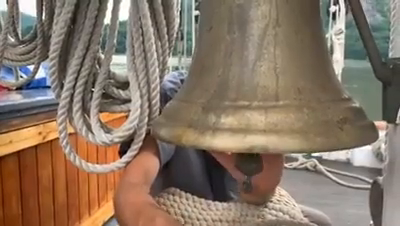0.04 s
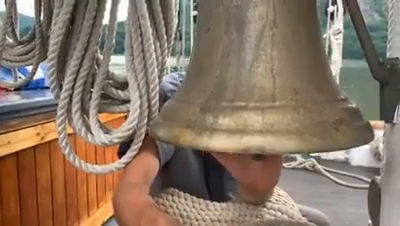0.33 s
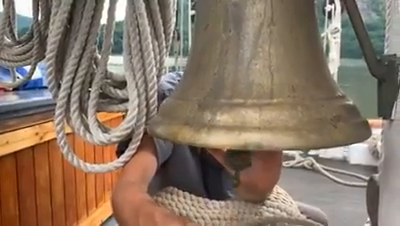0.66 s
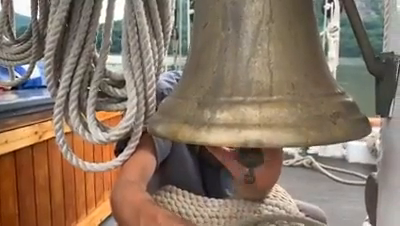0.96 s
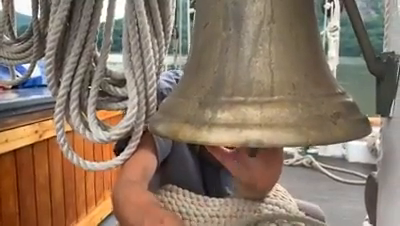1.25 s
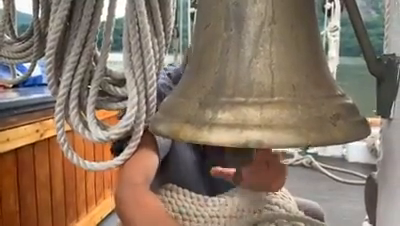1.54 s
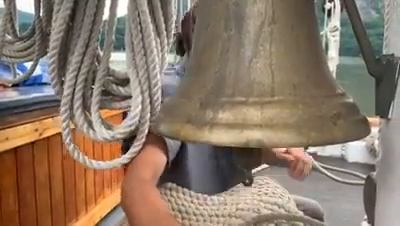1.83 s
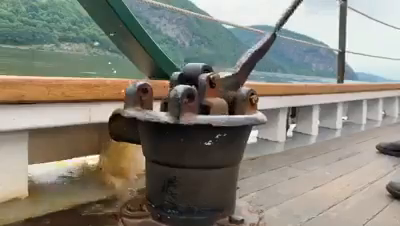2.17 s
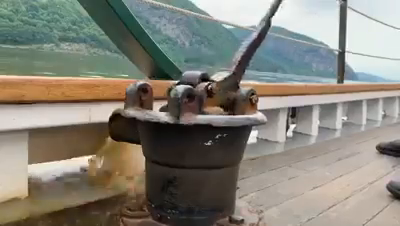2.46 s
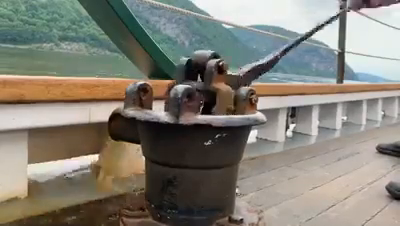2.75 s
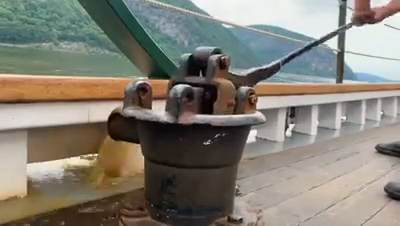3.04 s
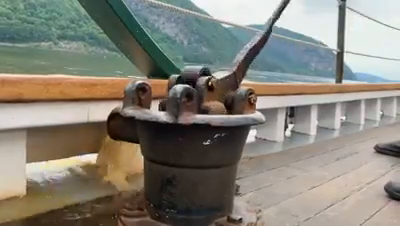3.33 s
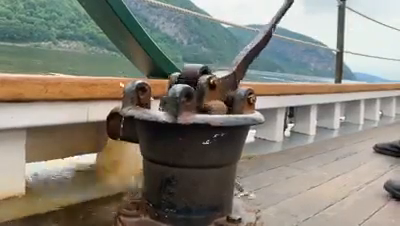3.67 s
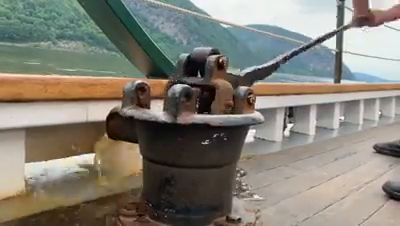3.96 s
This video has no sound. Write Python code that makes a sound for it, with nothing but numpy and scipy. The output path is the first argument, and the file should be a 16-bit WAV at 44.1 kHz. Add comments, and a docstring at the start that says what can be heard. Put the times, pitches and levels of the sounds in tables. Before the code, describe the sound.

A ship's bell rings on, then a hand pump gulps and splashes water onto a deck.

```python
"""On the deck of a sailing ship, in stereo. A bronze bell, already struck, rings on over a faint rumble of
air; its split partials beat, differently in each channel. Then an abrupt cut to a hand bilge pump, close
to the microphone: air gulps through its barrel, water churns, the iron linkage clacks and squeaks once.
The stream gushes from the spout and splashes on the planks in bubbles and spray."""
import sys
import numpy as np
from scipy import signal
from scipy.io import wavfile

SR = 44100
rng = np.random.default_rng(int(sys.argv[2]) if len(sys.argv) > 2 else 0)


def store_wav(level_fs):
    """Save 16-bit WAV to argv[1]."""
    pcm = np.round(np.clip(np.atleast_2d(level_fs), -1, 1) * 32767)
    wavfile.write(sys.argv[1], SR, pcm.T.astype(np.int16))


N = 176400
T = np.arange(N) / SR
SIDES = np.array([[1], [-1]])  # left, right


def from_db(db):
    """Decibels to gain."""
    return 10 ** (np.asarray(db) / 20)


def unit_rms(x):
    """Scale to an rms of 1."""
    return x / np.sqrt(np.mean(x ** 2) + 1e-20)


def in_time(rows):
    """Read (time, value) rows at every sample."""
    return np.interp(T, *np.transpose(rows))


def at_hz(rows, hz):
    """Read (frequency, value) rows on a log-frequency axis."""
    freqs, values = np.transpose(rows)
    return np.interp(np.log(hz), np.log(freqs), values)


def drift(per_s):
    """A random wander with a spread of about 1."""
    knots = rng.standard_normal(1000)
    return np.interp(T * per_s, np.arange(len(knots)), knots) * np.sqrt(3 / 2)


def swell(start_s, rise_s, order=1):
    """An envelope that climbs to 1 in rise_s and dies away; a higher order narrows it."""
    age = np.clip((T - start_s) / rise_s, 0, 60)
    return (age * np.exp(1 - age)) ** order


def band(x, low_hz, high_hz):
    """A gentle band-pass."""
    edges = [low_hz, min(high_hz, SR / 2 - 1000)]
    return signal.sosfilt(signal.butter(2, edges, "band", fs=SR, output="sos"), x)


def resonate(x, hz, width_hz):
    """A resonance with a peak gain of 1."""
    r = np.exp(-np.pi * width_hz / SR)
    return (1 - r * r) / 2 * signal.lfilter([1, 0, -1], [1, -2 * r * np.cos(2 * np.pi * hz / SR), r * r], x)


def spread(pair, hz):
    """Mix two unrelated noises to stereo: the bass sits near the centre, the treble is wide."""
    # likeness of the two channels: (frequency [Hz], correlation [0..1])
    likeness = [(60, .975), (250, .92), (1200, .6), (4000, .32), (15000, .38)]
    alike = at_hz(likeness, hz)
    return np.sqrt(1 + alike) * pair[0] + np.sqrt(1 - alike) * pair[1] * SIDES


def banded_noise(colour, flicker_db, flicker_per_s):
    """Half-octave bands of stereo noise, each flickering by itself; rms 1."""
    edges = 22 * 2 ** np.arange(0, 10.1, .5)
    out, white = 0, rng.standard_normal((2, 2, N))
    for k, (low, high) in enumerate(zip(edges, edges[1:])):
        hz, flicker = np.sqrt(low * high), drift(flicker_per_s)
        if colour[0][0] / 2 < hz < colour[-1][0] * 2:
            gain = from_db(at_hz(colour, hz) + flicker_db * flicker)
            out += gain * spread(band(white[k % 2], low, high), hz)
    return unit_rms(out)


def chirp(start_s, db, hz, rise_s, glide_per_s, order):
    """A short tone that swells, glides exponentially and dies."""
    age = np.clip(T - start_s, 0, .5)
    phase = 2 * np.pi * hz * np.expm1(glide_per_s * age) / glide_per_s
    return from_db(db) * swell(start_s, rise_s, order) * np.sin(phase)


def deck_air():
    """The faint rumble of open air behind the bell."""
    # spectrum of the air: (frequency [Hz], relative density [dB])
    colour = [(25, -20.5), (72, 0), (140, -15.5), (500, -28), (1500, -30), (3200, -50), (15000, -55.5)]
    return from_db(-61) * banded_noise(colour, flicker_db=1.5, flicker_per_s=8)


def bell():
    """The bronze rings down in steady partials; those with a close twin beat against it."""
    # the bell's modes and, at 2821 Hz, a very faint fading tone behind the bell:
    # (frequency [Hz], level [dB], left over right [dB], right's lead [rad], decay [dB/s]),
    # if split also (twin's offset [Hz], relative level [dB], relative pan [dB], beat dip on the left [s])
    tones = [(290.44, -40, -3.5, 0, 0, .62, -3.7, 3, 1.40),
             (722.04, -35.5, -5, .9, 0, -2.29, -2.7, 5, .265),
             (926.52, -25.7, 1, 1.5, 3.1, 2.04, -10, 0, .43), (1068.9, -51, -2, 0, 6.8),
             (1107.9, -35, 4, .6, .6, .85, -8.5, -2, 1.08),
             (1710.32, -38.2, 4.5, .7, 2.4, -9.74, -2.8, -3, .08), (1789.4, -37.5, 3, 1.2, 26),
             (2052.3, -40, 4, 1.7, 32), (2228.8, -45.5, 4, 1, 11.8, -.88, -1.5, 0, .92),
             (2422.33, -35, 4, 1.4, 14.7, 7.6, -11, -3, .12), (2821, -62, 1, 1, 9), (3246, -57, 3, 1.9, 46)]
    out, right = np.zeros((2, N)), np.array([[0], [1]])
    for hz, db, pan_db, lead, decay, *twin in tones:
        tone = np.exp(1j * (2 * np.pi * (hz * T + rng.random()) + lead * right))
        if twin:
            offset_hz, twin_db, twin_pan_db, dip_s = twin
            skew_turns = right * 70.6 / hz  # the right channel dips at other moments
            beat = np.exp(2j * np.pi * (offset_hz * (T - dip_s) + skew_turns))
            tone *= 1 - from_db(twin_db + twin_pan_db * SIDES / 2) * beat
        noise_db = -30 + 7 * np.log2(hz / 1000)  # faint added noise roughens each tone, more so higher up
        tone *= 1 + from_db(noise_db) * (drift(150) + 1j * drift(150))
        out += from_db(db - decay * T + pan_db * SIDES / 2) * tone.real
    return out


def barrel(gush_swing_db):
    """Pockets of air gulp and glug through the valve; the water churns with each gulp and with the flow."""
    # air gulps: (time [s], peak [dB], starting pitch [Hz], churn level [dB], churn rise [s])
    gulps = [(2.0905, -1, 231, -14, 0.017), (2.295, -17, 262, -18.5, 0.019), (2.55, -13.5, 210, -21, 0.015),
             (2.681, -16.5, 281, -29, 0.061), (2.838, -11, 227, -16, 0.015), (3.12, -15.5, 202, -21, 0.013),
             (3.2205, -2, 230, -14, 0.028), (3.249, -18.5, 333, -23, 0.03),
             (3.39, -18.5, 150, -19.5, 0.036), (3.686, -13.5, 162, -22.5, 0.029),
             (3.948, -5, 134, -8.5, 0.012)]
    # hollow glugs that plunge in pitch as the valve opens: (time [s], peak [dB], starting pitch [Hz])
    glugs = [(2.8181, -20, 890), (3.932, -21, 1166)]
    # spectrum of churning water: (frequency [Hz], relative density [dB])
    colour = [(42, -18), (68, 6.5), (130, 1.5), (260, -2.5), (400, -11.5), (530, -14.5), (1200, -30.5)]
    gulping = sum(chirp(s, db, hz, rise_s=1.29 / hz, glide_per_s=-7, order=3) for s, db, hz, *_ in gulps)
    glugging = sum(chirp(*glug, rise_s=.0089, glide_per_s=-64, order=2) for glug in glugs)
    gulp_power = sum((from_db(db) * swell(s, rise_s)) ** 2 for s, _, _, db, rise_s in gulps)
    flow_power = from_db(-32.5 + .27 * gush_swing_db) ** 2
    churn = np.sqrt(gulp_power + flow_power) * banded_noise(colour, flicker_db=3, flicker_per_s=30)
    return gulping + glugging + churn


def bubble_swarm(low_hz, high_hz, per_s, cycles, size_db, pitches=36):
    """Bubbles born in clumps ring briefly, each with its own size and place between left and right."""
    out = np.zeros((2, N))
    births_per_s = per_s * from_db(3 * drift(45))
    for hz in np.geomspace(low_hz, high_hz, pitches):
        born = np.flatnonzero(rng.random(N) < births_per_s / pitches / SR)
        size, side, sign = rng.random((3, 2000))[:, :len(born)]
        level_db = size_db * np.minimum(-np.log(size), 4)
        pan_db = 5 * (2 * side - 1) * SIDES
        kicks = np.full((2, N), 1e-18)
        kicks[:, born] = np.sign(sign - .5) * from_db(level_db + pan_db)
        width_hz = np.log(1000) / np.pi * hz / cycles  # 60 dB down after this many cycles
        ringing = resonate(kicks, hz, width_hz)
        out += resonate(ringing, hz, 2 * width_hz) / width_hz  # the second pass softens the onset
    return unit_rms(out)


def outflow(gush_db, gush_swing_db):
    """The stream from the spout: a wash full of bubbles."""
    # spectrum of the wash: (frequency [Hz], relative density [dB])
    colour = [(150, -18), (450, -1), (680, -3), (1200, 10), (1900, -12), (3500, -1), (8000, -46)]
    # bubble swarms: (lowest pitch [Hz], highest pitch [Hz], births [1/s], ring [cycles],
    # size spread [dB], level at mean gush [dB], share of the gush's swing [0..1])
    swarms = [(450, 1300, 420, 14, 2.5, -46, .65), (1300, 4300, 900, 20, 2.8, -43.5, .35),
              (4300, 14000, 2000, 22, 3, -47, .2)]
    wash = from_db(gush_db - 6.5) * banded_noise(colour, flicker_db=3.5, flicker_per_s=35)
    bubbles = sum(from_db(db + share * gush_swing_db) * bubble_swarm(*kind) for *kind, db, share in swarms)
    return wash + bubbles


def spray():
    """Fine droplets hiss all through the pumping and flare in sharp spatters."""
    # hiss of the droplets: (time [s], relative level [dB])
    hiss = [(2.3, -40), (2.5, -42.5), (2.64, -37.5), (2.95, -47.5), (3.06, -39), (3.9, -39), (4.0, -34.5)]
    # sharp spatters: (time [s], relative peak [dB])
    spatters = [(2.098, -25), (2.32, -21), (3.0683, -21.5), (3.236, -20.5), (3.264, -18), (3.3577, -22),
                (3.646, -19)]
    # spectrum of the spray: (frequency [Hz], relative density [dB])
    colour = [(500, -15), (1500, 1), (4200, -2), (5200, -2.5), (8000, 0.5), (15500, -7)]
    hiss_power = from_db(in_time(hiss) + 3.5) ** 2
    spatter_power = sum((from_db(db - 5.5) * swell(s - .002, rise_s=.004)) ** 2 for s, db in spatters)
    return np.sqrt(hiss_power + spatter_power) * banded_noise(colour, flicker_db=3, flicker_per_s=90)


def splashes():
    """Lumps of water slap the planks, each a short burst of noise around its own pitch."""
    # water landing: (time [s], level [dB], band centre [Hz])
    slaps = [(2.128, -26, 1590), (2.174, -22.5, 2040), (2.184, -23, 960), (2.255, -28.5, 1540),
             (2.32, -28, 1470), (2.678, -27, 1280), (2.82, -29.5, 1700), (3.107, -30, 2370),
             (3.2337, -22.5, 1380), (3.267, -26, 1920), (3.299, -28.5, 1060), (3.529, -25.5, 696),
             (3.932, -23.5, 1300), (3.946, -26, 1230)]
    out, edge_ratio = 0, 1.35
    for s, db, hz in slaps:
        burst = spread(band(rng.standard_normal((2, N)), hz / edge_ratio, hz * edge_ratio), hz)
        out += from_db(db) * swell(s, rise_s=.0045, order=2) * unit_rms(burst)
    return out


def linkage():
    """The handle's pins knock in their loose eyes, rattling the iron's modes; the linkage squeaks once."""
    # knocks of the pins: (time [s], level [dB])
    clacks = [(2.257, -31), (2.284, -27.5), (3.234, -24), (3.357, -24.5), (3.643, -30.5)]
    # a brief, high metallic squeak: (time [s], peak [dB], pitch [Hz], rise [s])
    squeaks = [(2.257, -19.5, 4050, 0.0068)]
    modes_hz = [2860, 3610, 4000, 4360]
    iron = sum(spread(resonate(rng.standard_normal((2, N)), hz, width_hz=250), hz) for hz in modes_hz)
    clacking = unit_rms(iron) * sum(from_db(db) * swell(s, rise_s=.0051) for s, db in clacks)
    return clacking + sum(chirp(*squeak, glide_per_s=.15, order=3) for squeak in squeaks)


def scene():
    """The bell in still air, then a cut to the pump at close range."""
    # strength of the gush from the spout: (time [s], relative level [dB])
    gush = [(2.1, -43.5), (2.32, -33.5), (2.49, -63.5), (2.57, -41.5), (2.74, -56), (2.85, -46.5),
            (3.03, -70), (3.18, -58.5), (3.26, -22.5), (3.5, -60.5), (3.72, -37.5), (3.89, -74.5), (4, -59)]
    cut_s, crossfade_s = 2.084, .005
    gush_db = in_time(gush)
    swing_db = gush_db - gush_db[T > cut_s].mean()
    at_pump = np.clip((T - cut_s) / crossfade_s + .5, 0, 1)
    air = deck_air()
    pump = barrel(swing_db) + linkage() + outflow(gush_db, swing_db) + splashes() + spray()
    return (1 - at_pump) * (bell() + air) + at_pump * pump


def record(dry):
    """The microphone drops the deepest bass, peaks are rounded and the top is cut steeply."""
    low_cut_hz, high_cut_hz = 51, 15700
    thinned = signal.sosfilt(signal.butter(2, low_cut_hz, "high", fs=SR, output="sos"), dry)
    return signal.sosfilt(signal.ellip(12, .1, 80, high_cut_hz, fs=SR, output="sos"), np.tanh(thinned))


dry = scene()
out = record(dry)
store_wav(out)
```